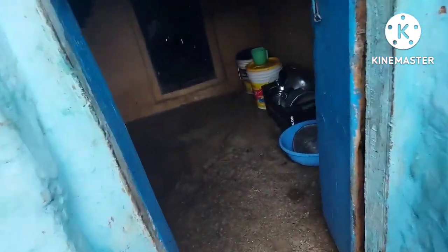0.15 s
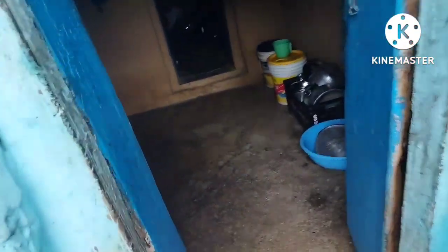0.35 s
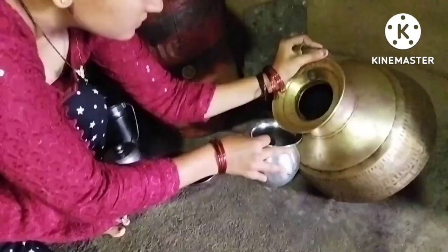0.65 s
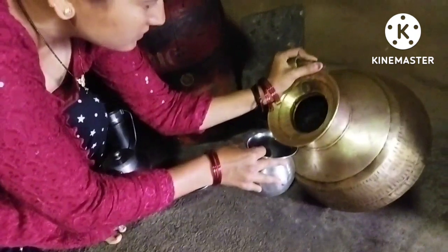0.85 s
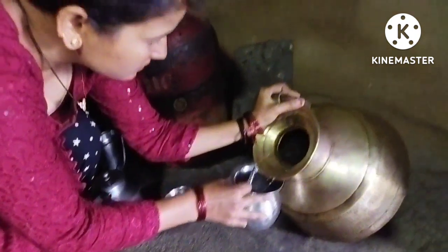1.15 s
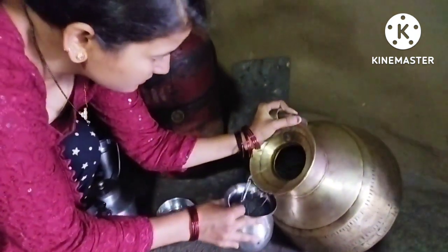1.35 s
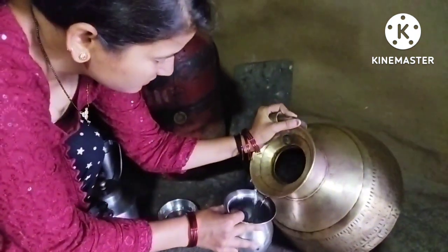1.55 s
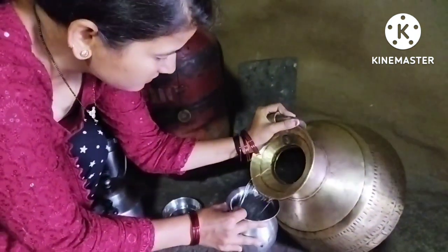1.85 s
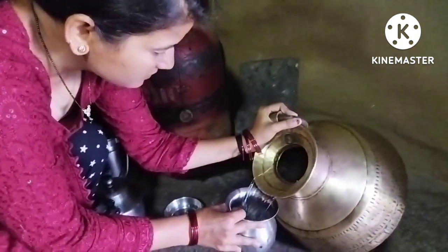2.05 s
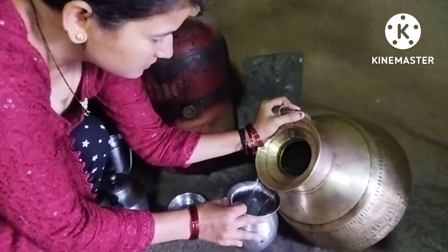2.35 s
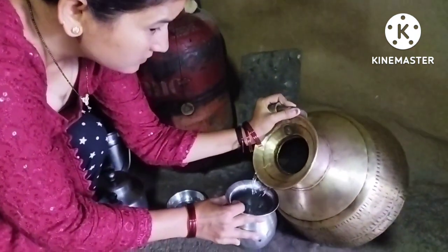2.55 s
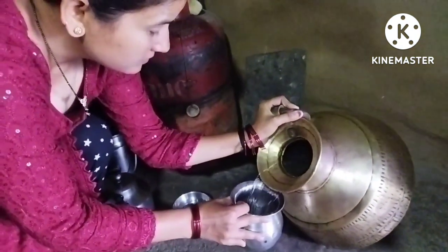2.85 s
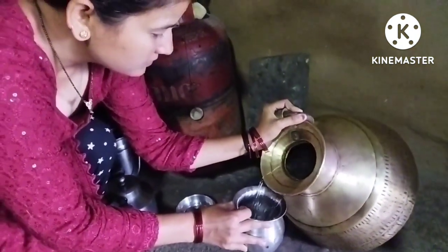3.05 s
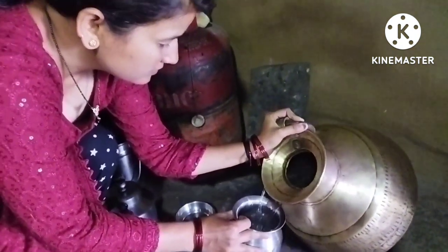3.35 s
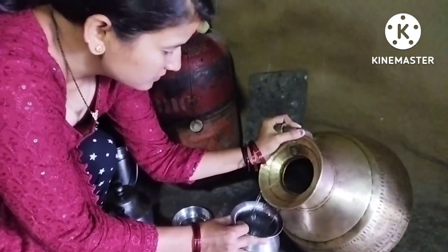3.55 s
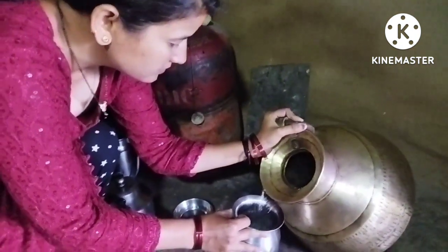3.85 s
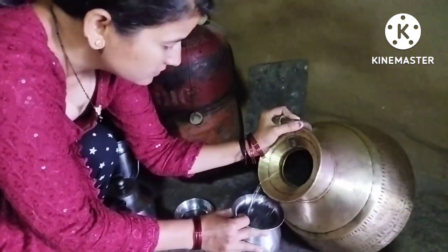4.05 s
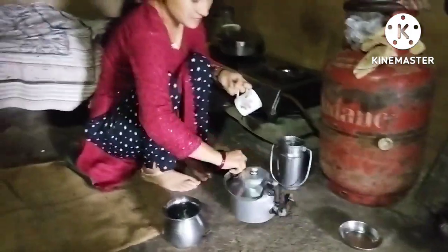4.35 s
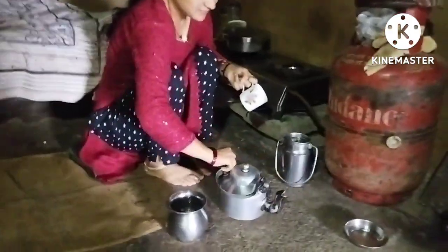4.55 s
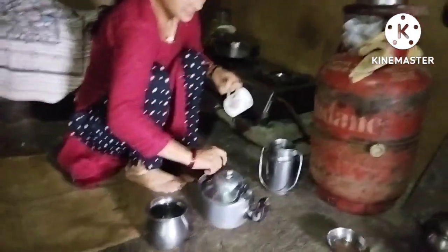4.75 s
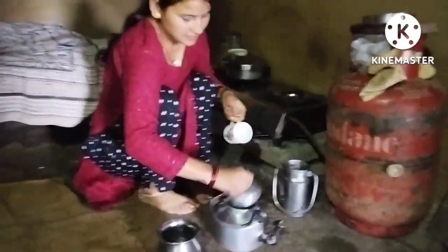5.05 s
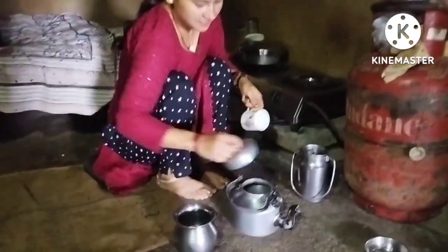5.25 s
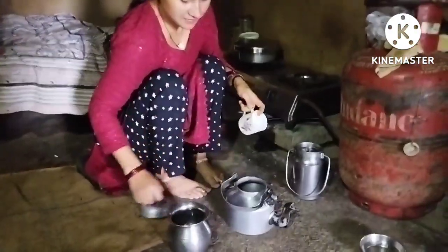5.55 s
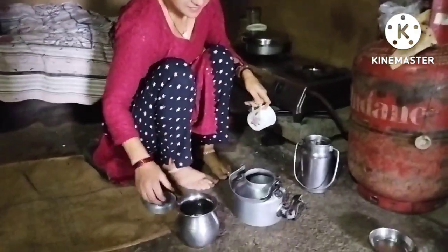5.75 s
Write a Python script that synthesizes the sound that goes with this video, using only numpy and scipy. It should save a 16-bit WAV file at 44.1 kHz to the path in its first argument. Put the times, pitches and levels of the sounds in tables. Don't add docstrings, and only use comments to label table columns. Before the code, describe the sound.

Soft foot scuffs, then water pours and glugs into a steel tumbler, followed by a sharp hollow kettle knock and a short slosh.

```python
import sys
import numpy as np
from scipy import signal
from scipy.fft import rfft, irfft, next_fast_len
from scipy.io import wavfile
from scipy.ndimage import uniform_filter1d

SR = 44100
rng = np.random.default_rng(int(sys.argv[2]) if len(sys.argv) > 2 else 0)


def bounce(signal):
    frames = np.transpose(np.atleast_2d(signal))
    limited = np.clip(frames, -1, 1)
    pcm = np.round(limited * 32767).astype(np.int16)
    wavfile.write(sys.argv[1], SR, pcm)


def attenuation_scalar(level_db):
    decades = np.asarray(level_db, float) / 20
    return 10 ** decades


N = 259985
T = np.arange(N) / SR

# (fade start [s], silence from [s], silence to [s], level step [s], fade depth [dB])
CUTS = [
    (.66, .703, .804, .912, -6),
    (4.2, 4.276, 4.345, 4.386, -12),
]
# (frequency [Hz], density [dB per Hz])
ROOM_TONE = [(18, -29.5), (30, -10.5), (161, -1), (404, -3), (526, -7.5), (913, -4), (1630, -8.5),
             (2060, -8), (5740, -15.5), (7090, -19.5), (12300, -15), (15300, -19), (15650, -47.5)]
# (time [s], width [s],
# rumble lift [dB], hiss lift [dB])
SWELLS = [(0, 0.12, 2.5, 3.5), (.7, 0.26, 2.5, 5), (1.08, 0.073, 5, 0.5), (1.28, 0.061, 8.5, 3),
          (2.72, .08, 4.5, 2.5), (2.8, 0.7, -0.5, 2.5), (4.58, 0.086, -1.8, 3), (4.9, 0.22, 10.5, 2.5),
          (5.05, 0.23, -3, 7.5)]
# (frequency [Hz], likeness [-1 to 1])
PORT_LIKENESS = [(60, 0.095), (180, 0.33), (550, 0.28), (1650, -0.6), (4970, -0.042), (15000, -0.54)]
# (frequency [Hz], t60 [s])
ROOM_DECAY = [(150, 0.26), (600, 0.24), (2500, 0.2), (8000, 0.2), (15000, 0.13)]
# (frequency [Hz], density [dB per Hz])
ROOM_TAPS = [(100, 0.022), (16000, 0.0053)]
# (time [s], level [dB], dull part [dB], length [s])
SCUFFS = [(0.08, -53, -36, 0.076), (0.155, -48.5, -14, 0.042), (0.1786, -51, 5.5, 0.021),
          (0.328, -49.5, -21, 0.026), (0.343, -53, -0.5, 0.028), (0.4884, -32.5, -13, 0.038),
          (0.529, -40, -22, 0.059), (0.661, -47, -8, 0.014), (0.91, -48, -25, 0.032),
          (5.137, -52, -16, 0.043), (5.1724, -57, 12, 0.032), (5.238, -34.5, -7, 0.057),
          (5.487, -51, -3, 0.052), (5.845, -58.5, -5, 0.067)]
# (frequency [Hz], density [dB per Hz])
RUB_COLOUR = [(710, -38), (1200, -12), (1610, -7), (2680, 1.5), (3290, -2), (4450, -1.5), (5650, -12),
              (6100, -7), (12100, -5), (16000, -11.5)]
# (frequency [Hz], density [dB per Hz])
THUMP_COLOUR = [(100, -29), (250, -3.5), (900, -12.0), (2000, -14.0), (3500, -25.5)]
# (time [s], pitch [Hz], level [dB])
SQUEAK = [(.815, 11350, -72), (.91, 11250, -75), (.96, 12000, -74), (1.05, 11800, -75), (1.15, 11550, -77),
          (1.27, 11250, -82)]
# (time [s], peak level [dB], centre [Hz])
TICKS = [(.188, -44, 1200), (.349, -39, 2500), (.518, -42, 1400), (.663, -44, 3000), (.845, -47, 2000),
         (.867, -46, 3500), (.915, -50, 3000), (1.087, -50, 1000), (1.235, -50, 700), (1.516, -46, 7000),
         (1.809, -40, 4500), (1.878, -44, 11000), (2.842, -48, 12000), (3.643, -54, 500),
         (4.012, -36, 4400), (4.013, -42, 1150), (4.013, -43, 2500), (4.015, -47, 9000), (4.186, -46, 1150),
         (4.238, -51, 12000), (4.391, -56, 1500), (4.749, -23, 9000), (4.752, -27, 4500),
         (4.757, -28, 9000), (4.783, -33, 3000), (5.139, -41, 2600), (5.175, -50, 6000), (5.24, -36, 6000),
         (5.262, -44, 6000), (2.553, -42, 3600), (1.9, -41, 3000), (1.78, -45, 4500), (.329, -52, 3000)]
# (frequency [Hz], level [dB], t60 [s])
LID_ON = [(554, 0, .32), (1001, -13, .45), (1534, -14, .4), (2234, -18, .35)]
# (frequency [Hz], level [dB], t60 [s])
LID_OFF = [(959, -14, 0.66), (1510, -10.5, 0.38), (1920, -4, 2.6), (3262, -15, 1.3), (4850, -16, 0.84),
           (6600, -24, 0.5)]
# (time [s], level [dB], share of outer modes [3 dB per octave])
LID_TAPS = [
    (4.392, -60, 1),
    (4.416, -54.5, -2),
    (5.3, -65.5, 4.5),
    (5.442, -60, 0),
    (5.54, -75.5, 0.5),
    (5.68, -74, 1),
]
# (time [s], level [dB], pitch [Hz])
GULPS = [(4.351, -43.5, 427), (5.139, -46, 283), (5.174, -39.5, 209), (5.19, -45, 198), (5.256, -46, 490),
         (5.286, -37, 284), (5.322, -25, 416), (5.352, -25, 394), (5.365, -39, 510), (5.399, -26.5, 398.5),
         (5.429, -29, 401), (5.469, -31, 380), (5.494, -33.5, 417), (5.519, -34, 383), (5.584, -37.5, 407),
         (5.654, -40, 421), (5.719, -51.5, 389)]
# (frequency [Hz], width [Hz], level [dB])
HOLLOW = [(284, 71, 3), (352, 50, -3.5), (388.5, 30, 10.5), (510.6, 14, 9.5)]
# (frequency [Hz], level [dB], t60 [s], phase lead of the left port [rad])
KETTLE_MODES = [(147, -21, 0.16, 0), (198, -16, 0.25, 0), (255, -16, 0.08, 0), (283, -16, .1, 0),
                (424, -18, 0.2, .5), (490, -25, 0.2, 3.3), (544, .5, 0.125, -0.08), (606, -25, 0.1, -1.5),
                (725, -11, 0.02, -0.5), (930, -7, 0.06, 1.34), (978, -16, 0.2, 1.8), (1080, -28, .1, 1),
                (1245, -17, 0.031, -0.5), (1384, -25, .1, 1), (1490, -10, 0.16, 2), (1820, -23, 0.097, 2),
                (2327, -34, .1, 1), (2700, -26, 0.057, 0), (4400, -31, 0.06, -1)]
# (time [s], level [dB], hardness [dB per octave], crack [dB])
KNOCKS = [(4.707, -13, 2.5, -18), (4.7217, -16, 2, -24), (4.749, -33, 8, -1), (4.775, -29, -7.5, -18),
          (5.241, -43, 0, -25)]
# (frequency [Hz], density [dB per Hz])
CRACK_COLOUR = [(410, -36), (700, -7), (1280, -21), (1500, 0), (1970, -34), (2270, -10.5), (7590, -24),
                (8990, -13), (13700, -24), (15400, -29.5), (16000, -58)]
# (time [s], gain [dB])
KETTLE_GAIN = [(4.77, 0), (4.86, -16), (5.1, 0)]
# (time [s], level [dB], centre [Hz])
MIST_SNAPS = [(2.6888, -58, 9230), (2.7262, -51, 14400), (2.7731, -53, 12100), (2.8424, -39, 12000),
              (2.9123, -47, 12100), (2.9547, -50, 13800), (2.9921, -43, 10800), (3.1787, -70, 10400),
              (3.2036, -66, 9740), (3.3797, -57, 12900), (3.452, -58, 12000), (3.5264, -58, 11900),
              (3.5713, -51, 12500), (3.6521, -62, 12300), (3.7159, -60, 12000), (3.7953, -66, 9720),
              (3.8626, -51, 8690), (3.896, -54, 7840), (3.9289, -55, 10800), (4.0113, -46, 9870),
              (4.0577, -58, 11900), (4.2013, -63, 10900), (4.2372, -58, 13000)]
# (time [s], level [dB])
FLOW = [(1.74, -63), (1.9, -45.5), (2.0, -61), (2.17, -58.5), (2.3, -51), (2.45, -53), (2.7, -58.5),
        (3.0, -68.5), (4.27, -76)]
# (time [s], level [dB], dull part [dB])
SPLASHES = [(1.513, -32, -17), (1.658, -50.5, -18), (1.7683, -38, -9.5), (1.807, -33.5, -8),
            (1.8754, -29, -11.5), (1.975, -39, -12), (1.996, -39, -0.5), (2.0215, -40, -4.5),
            (2.062, -44, 0.5), (2.089, -46.5, 7), (2.162, -37.5, -11), (2.213, -43.5, 9),
            (2.281, -37, -5.5), (2.324, -40.5, -2.5), (2.404, -45, -2), (2.445, -37, -8.5),
            (2.498, -40.5, 4), (2.542, -43.5, 2), (2.588, -49.5, 6.5), (2.776, -47.5, -2),
            (2.952, -45.5, -8), (3.214, -65, 11), (3.301, -51, 6), (4.237, -50, -19)]
# (frequency [Hz], density [dB per Hz])
SPRAY_COLOUR = [(710, -32), (1200, 1), (1380, -9.5), (1810, -16), (2110, -6), (3470, -7), (3790, -4),
                (7170, -7), (12100, -2.5), (15000, -6), (16000, -33)]
# (frequency [Hz], gain [dB])
DULL_SHARE = [(3000, 2.0), (4500, -8.5), (7000, -58.5)]
# (time [s], pitch [Hz])
WALL_PITCH = [(1.76, 1870), (2.7, 1820), (2.85, 1980), (3.62, 1790), (3.7, 2136), (4.2, 2110)]
# (time [s], level [dB], pitch [Hz])
WALL_TAPS = [(2.1034, -51, 1830), (2.5481, -43, 2834), (2.5955, -50, 1800), (2.6419, -49, 1852),
             (2.7302, -59, 1880), (2.7881, -56, 2820), (2.811, -55, 2840), (2.836, -51.5, 1974),
             (3.0744, -56, 1990), (3.2181, -57.5, 2540), (3.2535, -58, 1840), (3.3209, -59, 2670),
             (3.3408, -58, 2520), (3.3568, -55, 1760), (3.5748, -58.5, 1770), (3.706, -57, 2170),
             (3.7579, -57, 2103), (3.8701, -57, 2120), (3.901, -60, 2140), (3.9305, -60, 2150),
             (3.9584, -56, 2150), (4.1111, -52.5, 2200), (4.1634, -63, 2240)]
# (time [s], level [dB], pitch [Hz], t60 [s])
DRIPS = [(.195, -56, 610, .12), (.625, -57, 465, .2), (1.658, -61, 5100, .12), (1.695, -55, 6400, .08),
         (1.812, -52, 9050, .05), (1.824, -46, 1800, .2), (2.025, -54, 6300, .05), (2.22, -52, 1490, .14),
         (2.31, -55, 4400, .12), (4.752, -42, 8850, .16), (4.755, -45, 9300, .12), (5.67, -70, 2466, .3)]
# (time [s], level [dB], pitch [Hz])
PLINKS = [(1.7737, -40, 3030), (1.8106, -34.5, 2610), (1.8899, -28.5, 3376), (2.076, -38.5, 2600),
          (2.099, -36, 3540), (2.2157, -37.5, 2310), (2.4816, -41.5, 2540), (2.513, -37.5, 2550),
          (2.5524, -29.5, 3510), (3.2119, -43, 3340)]
# (time [s], level [dB], pitch [Hz])
GLUGS = [(1.904, -39.5, 781), (1.972, -49.5, 876), (1.996, -44, 916), (2.029, -49, 1110),
         (2.076, -52, 1146), (2.215, -38.5, 1197), (2.279, -39.5, 544), (2.293, -50, 1250),
         (2.331, -42, 649), (2.366, -50, 700), (2.387, -51.5, 790), (2.473, -46, 748), (2.502, -43, 634),
         (2.503, -48, 1110), (2.598, -46, 940), (2.624, -45, 756), (2.742, -50, 810), (2.762, -55, 1346),
         (2.834, -49, 794), (2.908, -55, 800), (2.987, -45.5, 666), (3.016, -45.5, 667), (3.055, -53, 680),
         (3.056, -56, 1180), (3.102, -62, 665), (3.144, -56.5, 733), (3.18, -56, 746), (3.214, -50.5, 770),
         (3.306, -61, 721), (3.353, -53, 790), (3.397, -60, 753), (3.43, -55.5, 833), (3.47, -66, 910),
         (3.503, -62, 904), (3.573, -54, 790), (3.607, -58, 815), (3.776, -62, 923), (3.869, -60, 840),
         (3.885, -48, 793), (3.957, -57.5, 950), (4.08, -67, 790)]
# (frequency [Hz], chance [0 to 1])
HOLES = [(3500, 0), (5000, .04), (7300, .12), (8500, .015), (12500, .02), (15500, .07)]

RUMBLE_DB, HISS_DB = -69.5, -68
DIM_DB, CLIMB_DB, STEP_DB, SETTLE_S = -18.5, 7, -5, 0.17
SPLASH_S, THIN_SPLASH_S, THIN_FROM_S = 0.034, 0.025, 2.7
MIST_DB, MIST_PER_S = -71, 30
SWARM_DB, COLUMN_DB, WALL_DB = -6, -24, -80.5
COLUMN_CLIMB_PER_S, COLUMN_FADE_DB_PER_S = 1.68, 30
GLUG_CYCLES, PLINK_CYCLES, GULP_CYCLES, WALL_CYCLES = 49, 80, 27, 111
SLOSH_S, SLOSH_DB, SLOSH_RISE_DB_PER_S, SLOSH_FALL_DB_PER_S = 5.33, -49, 186, 60
EDGE_HZ, LOUD_DB = 15900, -84


def evened(x):
    return x / np.sqrt(np.mean(x ** 2) + 1e-20)


def read(points, hz):
    f, value = np.transpose(points)
    return np.interp(np.log(hz + 1), np.log(f + 1), value)


def curve(rows, k):
    rows = np.asarray(rows)
    return np.interp(T, rows[:, 0], rows[:, k])


def during(rows):
    return (T > rows[0][0]) & (T < rows[-1][0])


def add(mix, s, sound):
    part = mix[..., round(s * SR):][..., :sound.shape[-1]]
    part += sound[..., :part.shape[-1]]


def colour(x, points):
    gain_db = read(points, np.fft.rfftfreq(x.shape[-1], 1 / SR))
    return irfft(rfft(x) * attenuation_scalar(gain_db), x.shape[-1])


def resonate(x, hz, width):
    turn = np.exp(2j * np.pi * np.cumsum(hz * np.ones(N)) / SR)
    r = np.exp(-np.pi * width / SR)
    return 2 * (turn * signal.lfilter([1 - r], [1, -r], x / turn)).real


def pair(points, same_share):
    a, b = rng.standard_normal((2, next_fast_len(N)))
    same = np.clip(read(PORT_LIKENESS, np.fft.rfftfreq(len(a), 1 / SR)) + same_share, 0, 1)
    right = irfft(same * rfft(a) + np.sqrt(1 - same ** 2) * rfft(b), len(a))
    return evened(colour(np.array([a, right]), points))[:, :N]


def swell(s, db, length, rise, pan_db):
    out = np.zeros((2, N))
    for s, db, length, pan_db in np.broadcast(s, db, length, pan_db):
        t = np.arange(int(4 * length * SR) + 9) / SR
        shape = (1 - np.exp(-t / rise)) * np.exp(-(t / length) ** 1.46)
        add(out, s, attenuation_scalar(db + np.array([[pan_db], [-pan_db]]) / 2) * shape)
    return out


def flicker(size, depth_db):
    smooth = uniform_filter1d(uniform_filter1d(rng.standard_normal(N), size), size)
    return attenuation_scalar(depth_db * evened(smooth))


def patchy(x, patch_db):
    z = signal.stft(x, nperseg=256)[2]
    field = rng.standard_normal(z.shape[:0:-1])
    field = uniform_filter1d(uniform_filter1d(field, 5, axis=0), 5, axis=1)
    return evened(signal.istft(z * attenuation_scalar(patch_db * evened(field).T), nperseg=256)[1][:, :N])


def kicks(per_s, spread_db):
    size = attenuation_scalar(spread_db * np.minimum(rng.exponential(1, N), 4))
    return size * (rng.random(N) < per_s / SR)


def burst(low_hz, high_hz, fall_s):
    t = np.arange(500) / SR
    band = signal.butter(1, [low_hz, high_hz], "band", fs=SR)
    grit = signal.lfilter(*band, rng.standard_normal(500)) * np.exp(-t / fall_s)
    return grit / abs(grit).max()


def lasting(rows, cycles):
    return [(s, db, hz, cycles / hz) for s, db, hz in rows]


def bubbles(rows, rise, glide, spread=0, mate_db=-99):
    out, t = np.zeros(N), np.arange(SR // 6) / SR
    for s, db, hz, t60 in rows:
        a, b, c = rng.uniform(-0.64, 1, 3)
        turns = hz * (t + glide * t ** 2 / t60)
        higher = np.sin(2 * np.pi * turns * (1 + spread * (1.45 + a / 2)))
        lower = np.sin(2 * np.pi * (turns * (1 - spread * (1.41 + b / 2)) + c))
        ring = np.sin(2 * np.pi * turns) + attenuation_scalar(mate_db) * (higher + lower)
        add(out, s, attenuation_scalar(db - 60 * t / t60) * (1 - np.exp(-t / rise)) * ring)
    return out


def air():
    rumble = pair([p for p in ROOM_TONE if p[0] < 700] + [(900, -86.0)], 0.042)
    rumble = rumble * flicker(size=900, depth_db=2.0)
    hiss = pair([(300, -64.0)] + [p for p in ROOM_TONE if p[0] > 500], 0)
    hiss = patchy(hiss, 1.4) * flicker(size=500, depth_db=-1.0)
    low_db, high_db = sum(np.outer(lift_db, np.exp(-((T - s) / width) ** 2))
                          for s, width, *lift_db in SWELLS)
    return attenuation_scalar(RUMBLE_DB + low_db) * rumble + attenuation_scalar(HISS_DB + high_db) * hiss


def scuffs():
    s, db, dull_db, length = np.transpose(SCUFFS)
    pan = 0.71 * rng.standard_normal(len(s))
    rub = patchy(pair(RUB_COLOUR, .2), 2.5) * flicker(size=60, depth_db=2.5)
    bright = swell(s, db - 9, length, .001, pan) * rub
    dull = swell(s, db + dull_db - 7.5, 1.34 * length, 0.00051, pan) * pair(THUMP_COLOUR, 0.29)
    return bright + dull


def squeak():
    tone = np.sin(2 * np.pi * np.cumsum(curve(SQUEAK, 1)) / SR)
    return during(SQUEAK) * attenuation_scalar(curve(SQUEAK, 2) + 7) * tone * flicker(size=200, depth_db=2.5)


def ticks():
    out = np.zeros(N)
    for s, db, hz in TICKS:
        add(out, s, attenuation_scalar(db) * burst(hz / 1.5, hz * 1.4, .0007 + 1.2 / hz))
    return out


def lid():
    out, t = np.zeros(N), np.arange(SR // 2) / SR
    for s, tap_db, outer in LID_TAPS:
        modes, rise = (LID_ON, .0007) if s < 5 else (LID_OFF, .02)
        for hz, db, t60 in modes:
            waver_db = 2 * np.sin(2 * np.pi * (4 * t + rng.random()))
            share_db = outer * abs(np.log2(hz / 1922)) * 3
            ring = attenuation_scalar(tap_db + db + waver_db + share_db - 60 * t / t60) * (1 - np.exp(-t / rise))
            add(out, s, ring * np.sin(2 * np.pi * hz * (t + s)) * np.cos(np.pi * t) ** .5)
    return out


def slosh():
    noise = rng.standard_normal(N)
    hollow = evened(sum(attenuation_scalar(db) * resonate(resonate(noise, hz, width), hz, 3 * width)
                        for hz, width, db in HOLLOW))
    fall_db = np.maximum(SLOSH_RISE_DB_PER_S * (SLOSH_S - T), SLOSH_FALL_DB_PER_S * (T - SLOSH_S))
    shiver = 2 * bubbles([(s, db - 28.0, hz, .1) for s, db, hz in GULPS[3:]], 0.00064, 0)
    heaves = [(s, db - 6.5 - 40 * max(s - 5.4, 0), 330 + hz / 2, .065) for s, db, hz in GULPS[4:]]
    gulps = attenuation_scalar(-2.0) * bubbles(lasting(GULPS, GULP_CYCLES), 0.002, 0.011, 0.172, -11.5)
    return attenuation_scalar(SLOSH_DB - fall_db) * hollow + shiver + bubbles(heaves, 0.0085, 0) + gulps


def kettle():
    out, t = np.zeros((2, N)), np.arange(SR // 2) / SR
    for s, blow_db, hard, _ in KNOCKS:
        for k, (hz, db, t60, lead) in enumerate(KETTLE_MODES):
            level_db = blow_db + db + hard * np.log2(hz / 544) - 60 * t / t60
            ring = attenuation_scalar(level_db) * (1 - np.exp(-t / 0.0016))
            phase = np.array([[lead], [-lead]]) / 2
            add(out, s, (-1) ** k * ring * np.sin(2 * np.pi * hz * t + phase))
    s, db, _, crack_db = np.transpose(KNOCKS)
    crack = swell(s, db + crack_db, 0.026, 0.0003, 1.6) * pair(CRACK_COLOUR, 0.32)
    return (out + crack) * attenuation_scalar(curve(KETTLE_GAIN, 1))


def snaps():
    out = np.zeros(N)
    for s, db, hz in MIST_SNAPS:
        add(out, s, attenuation_scalar(db - 0.5) * burst(hz / 0.97, min(hz * 1.1, 16000), .003))
    return out


def spray():
    s, db, dull_db = np.transpose(SPLASHES)
    length = np.where(s < THIN_FROM_S, SPLASH_S, THIN_SPLASH_S)
    pan = 5.3 * rng.standard_normal(len(s))
    water = patchy(pair(SPRAY_COLOUR, 0.45), 2.4) * flicker(size=40, depth_db=1.5)
    dull = colour(water, DULL_SHARE)
    fizz = during(FLOW) * attenuation_scalar(curve(FLOW, 1) - 8.0)
    bright = (swell(s, db - 14.5, length, 0.002, pan) + fizz) * (water - dull)
    thud = swell(s, db + dull_db - 6.0, 0.78 * length, 0.0026, pan) * dull
    mist = signal.oaconvolve(kicks(MIST_PER_S, 2), np.exp(-np.arange(900) / 160))[:N] * during(FLOW)
    return bright + attenuation_scalar(MIST_DB) * mist * np.diff(water, 2, prepend=0, append=0) + thud


def tumbler_wall():
    pitch = curve(WALL_PITCH, 1) * flicker(size=1500, depth_db=.2)
    wall = during(WALL_PITCH) * attenuation_scalar(WALL_DB) * evened(resonate(kicks(500, 2.5), pitch, 75))
    thin = (T > 3.1) * during(FLOW) * attenuation_scalar(-80) * evened(resonate(kicks(400, 3.5), 5850, 90))
    empty = (T > .85) * (T < 1.76) * attenuation_scalar(-80) * evened(resonate(kicks(300, 3), 1880, 110))
    return wall + thin + empty


def air_column():
    latest = np.maximum(np.searchsorted(np.transpose(GLUGS)[0], T) - 1, 0)
    s, glug_db, glug_hz = np.transpose(GLUGS)[:, latest]
    climb = COLUMN_CLIMB_PER_S * np.minimum(T - s, .1) * np.where(T < THIN_FROM_S, 1, .5)
    hz = glug_hz * (1 + climb) * flicker(size=900, depth_db=0.4)
    column = evened(resonate(resonate(kicks(900, 2), hz, 38), hz, 150))
    level_db = 0.8 * (glug_db + 48.5) - 45 + COLUMN_DB - COLUMN_FADE_DB_PER_S * (T - s)
    return during(FLOW) * (T > GLUGS[1][0]) * attenuation_scalar(level_db) * column


def bubble_swarm():
    swarm, t = np.zeros(N), np.arange(900) / SR
    for hz in np.geomspace(1500, 6500, 16):
        shape = (1 - np.exp(-t / 0.0004)) * np.exp(-t * hz / 16)
        chirp = shape * np.sin(2 * np.pi * hz * t * (1 + 14 * t))
        swarm += signal.oaconvolve(kicks(70, 4.8), chirp)[:N]
    return during(FLOW) * attenuation_scalar(curve(FLOW, 1) + SWARM_DB) * evened(swarm)


def pouring():
    glugs = attenuation_scalar(-0.5) * bubbles(lasting(GLUGS, GLUG_CYCLES), 0.0013, 0.075, 0.084, -17.5)
    plinks = attenuation_scalar(-5.0) * bubbles(lasting(PLINKS, PLINK_CYCLES), 0.00042, 0.032, 0.121, -11.5)
    taps = attenuation_scalar(0.3) * bubbles(lasting(WALL_TAPS, WALL_CYCLES), .0008, .01, .05, -15.5)
    drips = bubbles(DRIPS, 0.00085, 0.0021)
    return (glugs + plinks + taps + drips) * flicker(size=150, depth_db=1.5)


def room(x):
    taps = pair(ROOM_TAPS, 0.22)[:, :SR // 2] * (np.arange(SR // 2) > 150)
    hz, t, z = signal.stft(taps, SR, nperseg=256)
    tail = signal.istft(z * attenuation_scalar(-60 * t / read(ROOM_DECAY, hz)[:, None]), SR, nperseg=256)[1]
    return signal.fftconvolve(x, tail / np.linalg.norm(tail[0]), axes=1)[:, :N]


def scene():
    tumbler = tumbler_wall() + air_column() + bubble_swarm() + pouring()
    near = squeak() + ticks() + lid() + slosh() + snaps() + tumbler
    near = np.array([np.roll(near, 2), near])
    rub, pot = scuffs() + spray(), kettle()
    return near + rub + pot + room(attenuation_scalar(-5) * near + attenuation_scalar(-11) * rub + attenuation_scalar(-16.5) * pot) + air()


def dropouts(x):
    hz, t, z = signal.stft(x, SR, nperseg=1024)
    chance = read(HOLES, hz[::6])
    kept = rng.random((len(t) // 4 + 1, len(chance))) > chance
    kept = kept.repeat(4, axis=0).repeat(6, axis=1)[:len(t), :len(hz)].T
    loud = abs(z[:, 200:300]).mean(axis=(0, 1)) > attenuation_scalar(LOUD_DB)
    return signal.istft(z * (kept | loud), nperseg=1024)[1][:, :N]


def fades():
    gain_db = np.zeros(N)
    for start, off, on, step, depth_db in CUTS:
        times = [start, off - .008, off, on, on + .004, step, step + .004, step + SETTLE_S]
        levels = [0, depth_db, -70, -70, DIM_DB, DIM_DB + CLIMB_DB, STEP_DB, 0]
        gain_db += np.interp(T, times, levels)
    return gain_db


def low_pass(x):
    return signal.sosfilt(signal.butter(12, 16510, fs=SR, output="sos"), x)


def record(dry):
    gain_db = fades()
    thin = dropouts(signal.lfilter(*signal.butter(2, 70, "high", fs=SR), dry))
    faded = thin * attenuation_scalar(gain_db) * (gain_db > -60)
    mix = signal.oaconvolve(faded, signal.firwin(255, EDGE_HZ, fs=SR)[None], "same")
    return low_pass(mix)


dry = scene()
out = record(dry)
bounce(out)
```